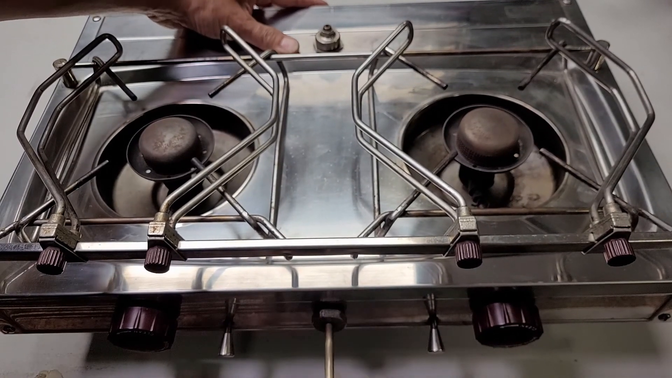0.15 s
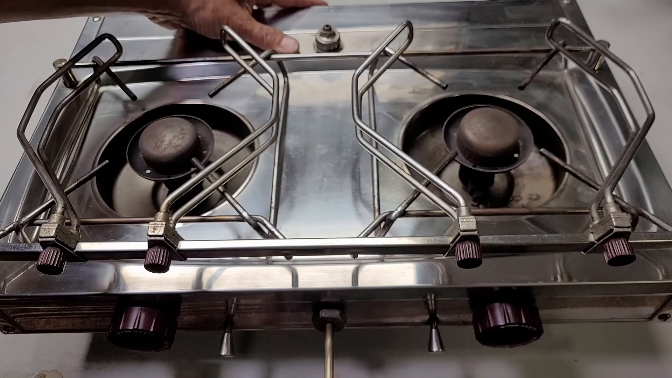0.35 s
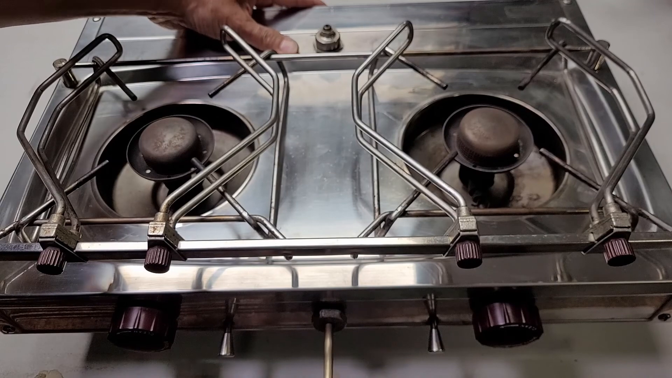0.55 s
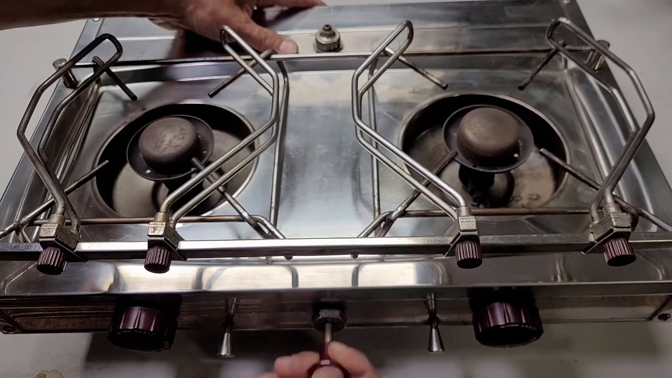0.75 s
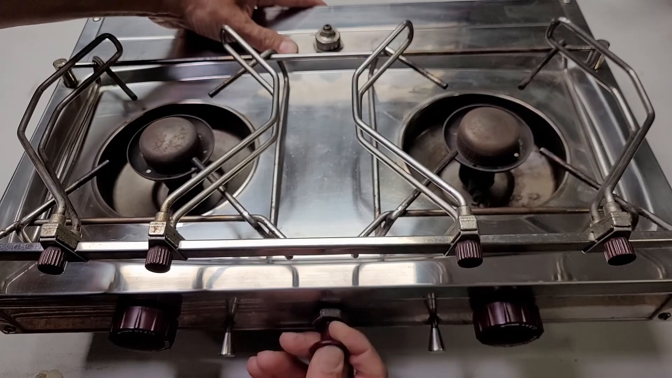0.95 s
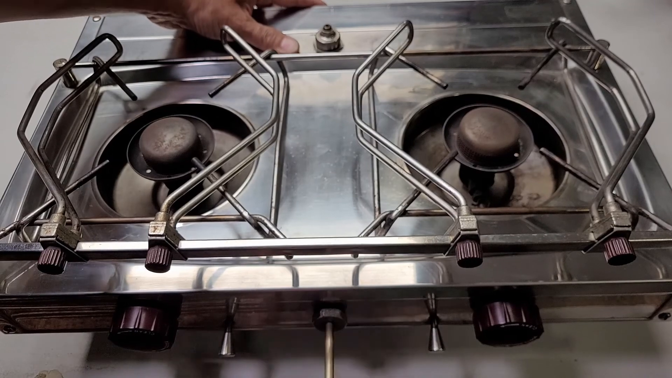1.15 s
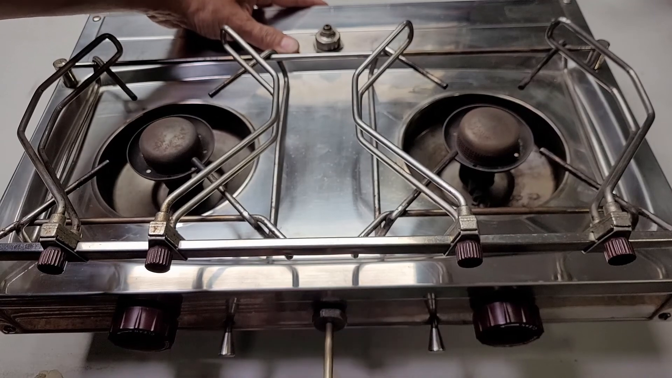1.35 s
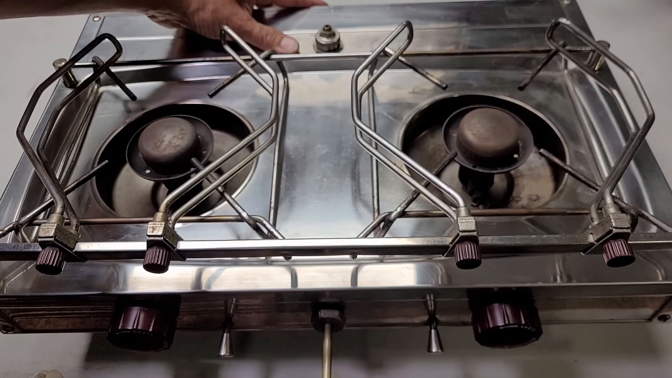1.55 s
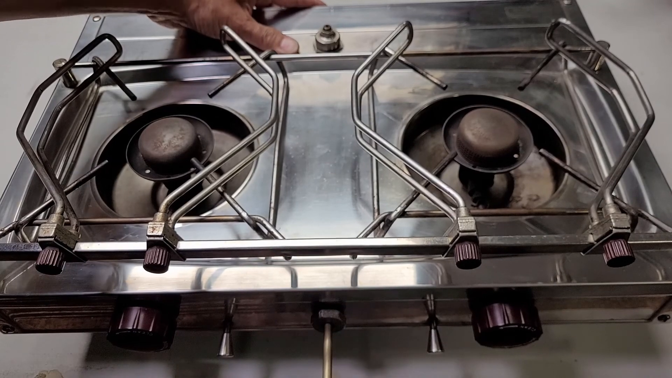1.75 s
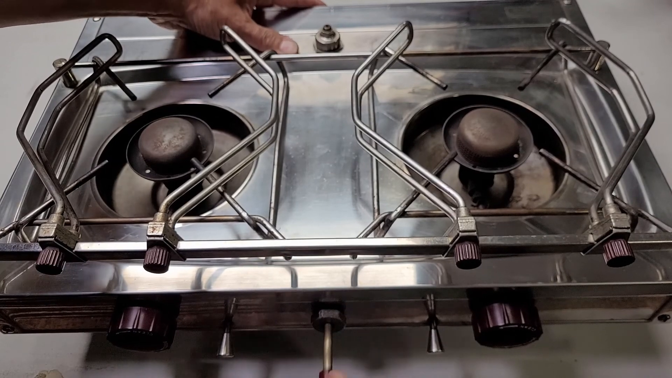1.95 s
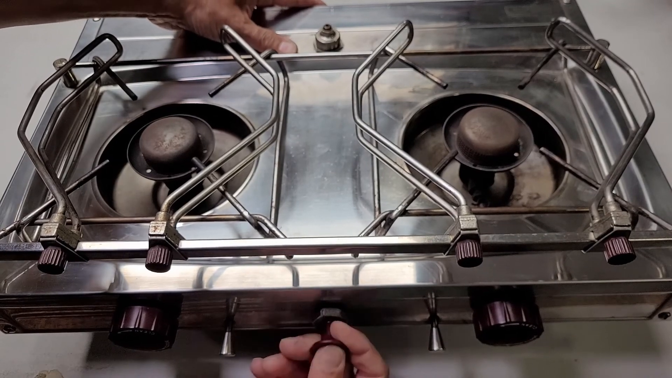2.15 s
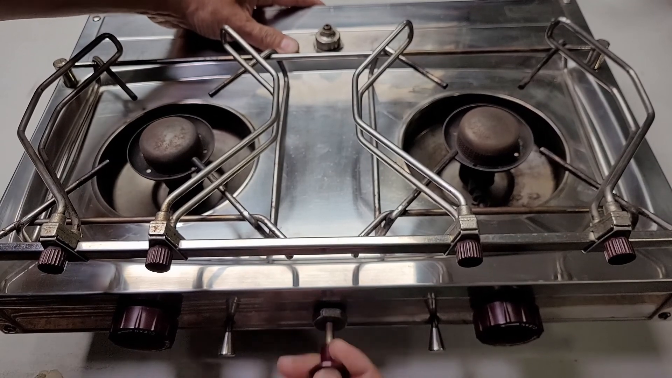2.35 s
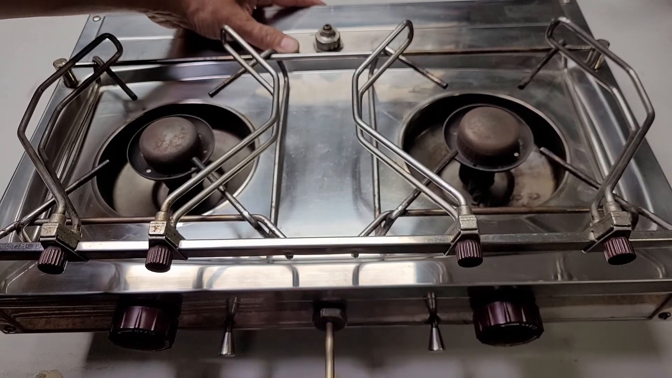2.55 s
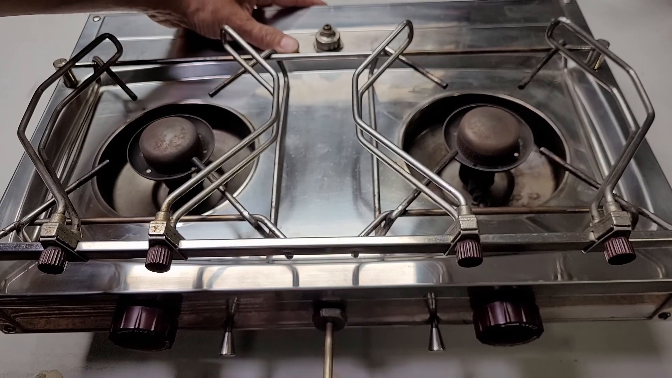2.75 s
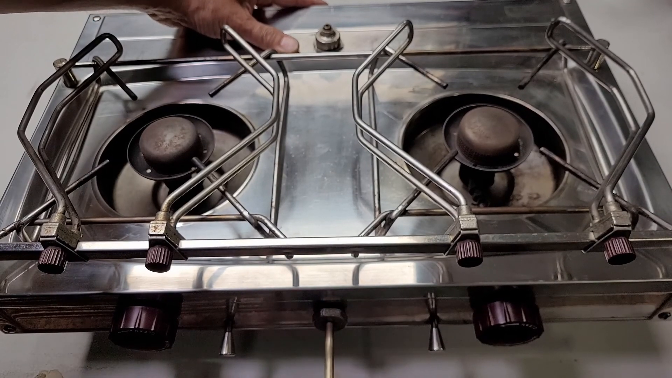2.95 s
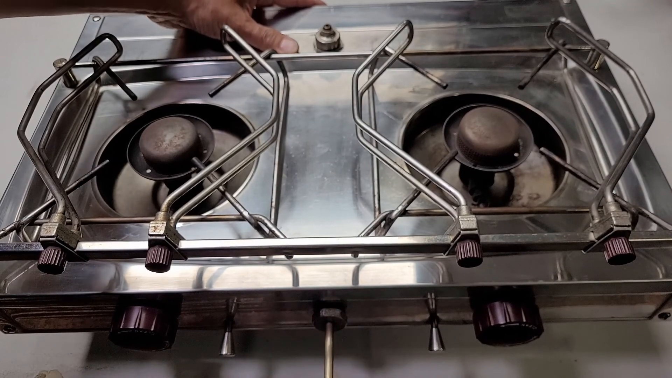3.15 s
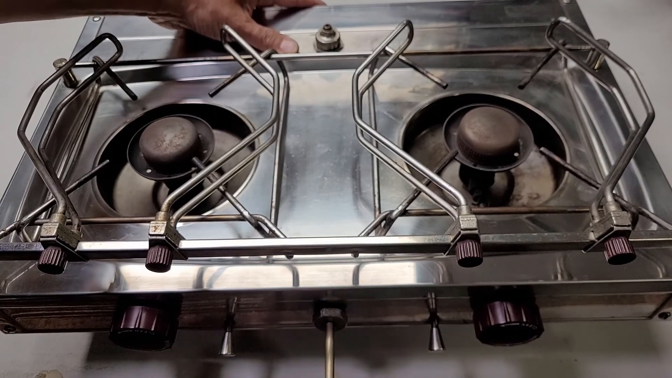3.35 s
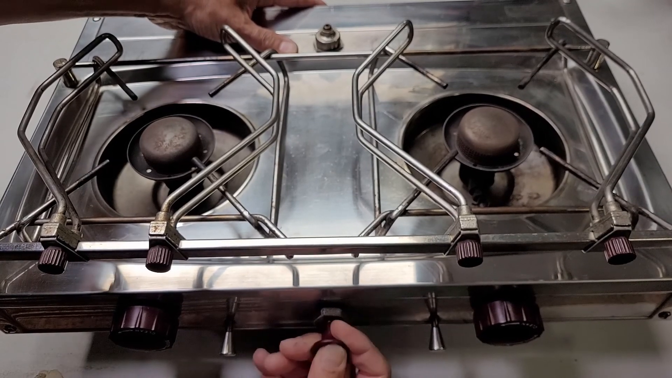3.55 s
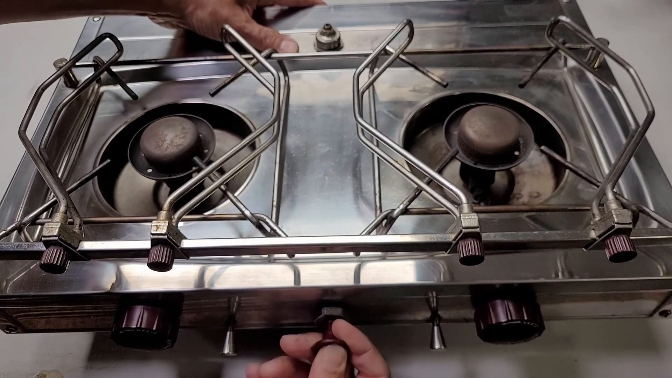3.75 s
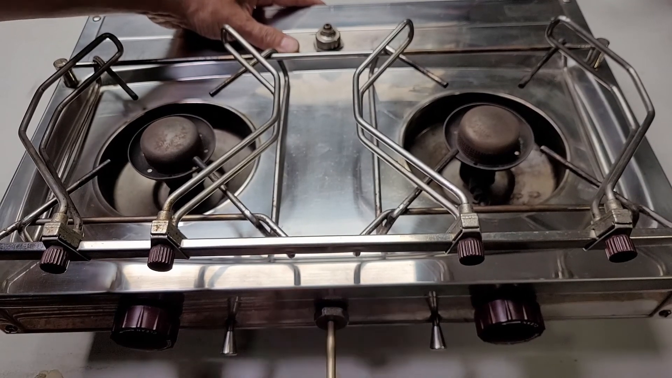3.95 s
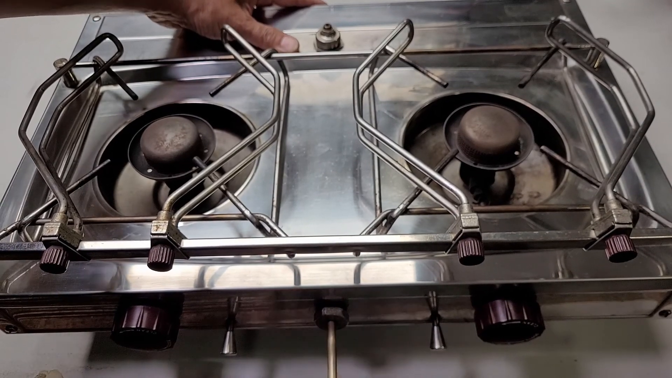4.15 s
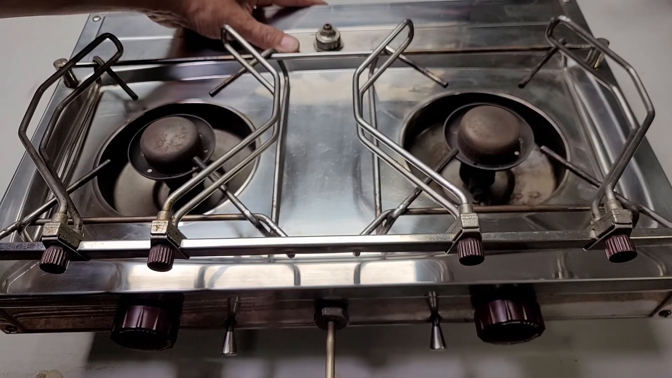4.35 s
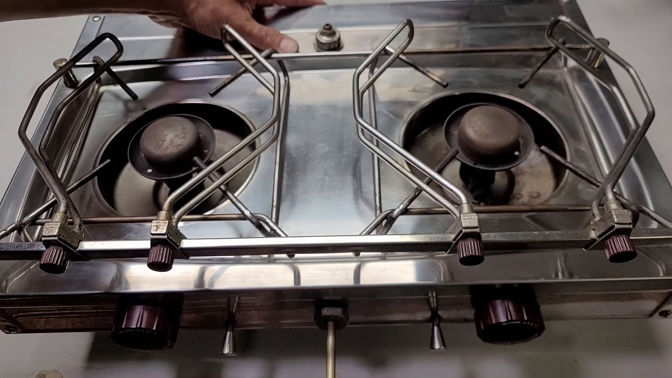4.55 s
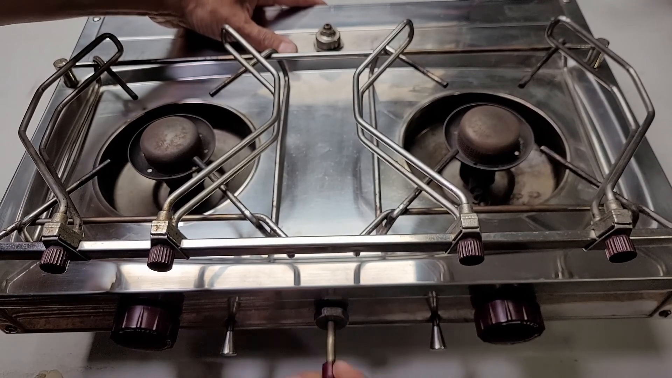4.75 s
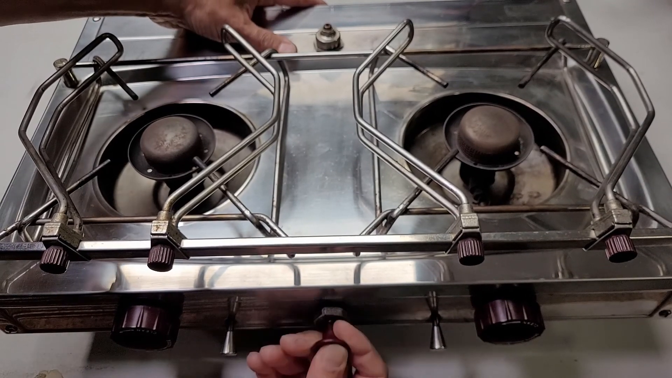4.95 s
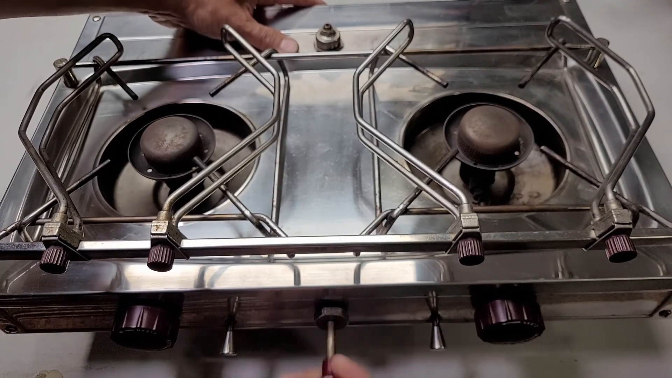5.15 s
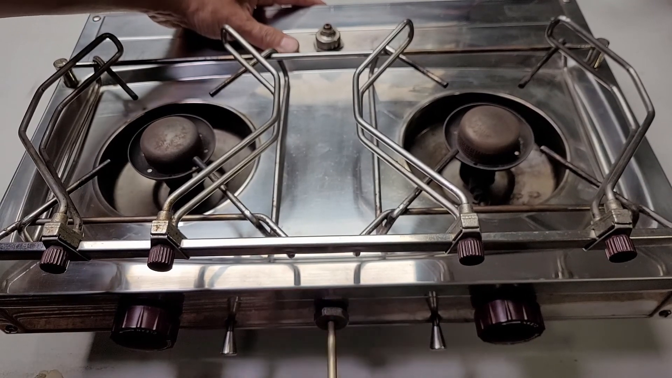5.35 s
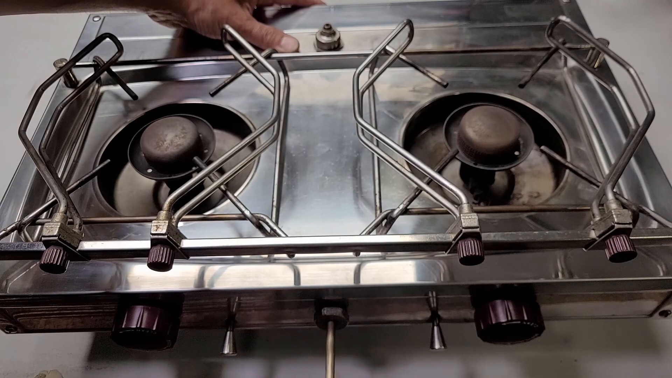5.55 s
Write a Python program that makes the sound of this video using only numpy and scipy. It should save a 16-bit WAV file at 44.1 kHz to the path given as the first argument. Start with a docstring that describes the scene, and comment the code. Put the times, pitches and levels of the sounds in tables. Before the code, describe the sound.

Four close pump strokes on a steel kerosene stove hiss and clank, with faint rubbing as the rod is drawn back.

```python
"""The hand pump of a steel kerosene stove is worked in four short strokes, close by in a small room.
Each push drives hissing air into the tank and ends with the plunger knocking the sheet-steel body.
As the rod is drawn back it rubs and catches, air slips past the cup washer (the pump's seal) with a
thin whistle, and the rod bumps its back stop. Between strokes the slack rod shifts and squeaks faintly."""
import sys
import numpy as np
from scipy import signal
from scipy.fft import rfft, irfft, next_fast_len
from scipy.io import wavfile

SR = 44100
rng = np.random.default_rng(int(sys.argv[2]) if len(sys.argv) > 2 else 0)


def int16_out(signal):
    """Quantize to a 16-bit WAV file."""
    q = np.round(np.clip(np.atleast_2d(signal).T, -1, 1) * 32767)
    wavfile.write(sys.argv[1], SR, q.astype(np.int16))


N = 247401
TIME = np.arange(N) / SR
AGE = TIME[:int(1.2 * SR)]  # seconds since one short sound began
ROOM_T60_S = .27  # a t60 is the time a sound takes to fade by 60 dB
RUB_ATTACK_S, RUB_RELEASE_T60_S = .074, .35

# air slipping past the washer at the end of a draw: t/s, length/s, puff/dB, whistle/dB
INTAKES = [(0, 0.0034, -34.5, -36), (1.363, 0.03, -42, -39), (2.689, .035, -41.5, -40),
           (4.174, 0.029, -40.5, -43.5)]
# spurts of air forced through the valve: t/s, length/s, hiss/dB, tank drone/dB, thud/dB
SPURTS = [(.742, 0.029, -33.5, -26.5, -26.5), (0.782, 0.041, -33.5, -27, -26.5),
          (0.82, .03, -33.5, -26.5, -19), (.861, 0.052, -30, -21, -15.5), (2.064, .049, -33, -21.5, -23.5),
          (2.086, .065, -30.5, -23, -17.5), (3.588, 0.035, -29, -15, -27),
          (3.597, 0.064, -28, -18.5, -37.5)]
# the rod being drawn back: t/s, length/s, rub/dB, hiss/dB, thud/dB
DRAWS = [(1.119, 0.22, -56.5, -63.5, -31), (2.404, 0.24, -60.5, -66.5, -37.5),
         (3.882, 0.322, -60, -67, -36.5), (5.21, 0.22, -59, -60, -27)]
# modes (natural ringing tones) of the steel body: f/Hz, level/dB, t60/s
BODY_MODES = [(269, -9, .5), (329, 2, .38), (488, -17, .25), (626, -5.5, .25), (721, -5, .25),
              (758, -3, .3), (821, -9, .25), (918, -3, .26), (996, -12, .35), (1077, -9.5, .26),
              (1210, -6, .25), (1245, -10, .25), (1405, -10, .33), (1491, -2, .24), (1588, -8, .2),
              (1952, -10, .28), (2106, -11, .35), (2223, -5, .24), (2519, -15, .26), (2799, -17, .24),
              (2993, -15, .27), (3230, -12, .2), (3541, -9, .22), (3600, -10, .2), (3677, -11, .25),
              (4094, -13, .3), (4274, -16, .28), (4447, -10, .18)]
# modes of the wire pan supports: f/Hz, level/dB, t60/s
WIRE_MODES = [(4100, -4, .9), (4590, -3, 1.5), (4670, -1, 1.8), (4740, -4, 1.4), (7350, 3, .65),
              (7620, 4, .65)]
# stereo width, the side (opposite in the two ears) against the mid (same in both): f/Hz, level/dB
STEREO_WIDTH = [(30, -11.5), (120, -12.5), (280, -16), (550, -5), (1000, -3.5), (2000, 1.5), (5000, 0),
                (16000, 0)]


def amp(db):
    """Turn decibels into a gain."""
    return 10 ** (np.asarray(db) / 20)


def along(points, hz):
    """Read between (frequency, value) points on a log-frequency axis."""
    f, value = np.transpose(points)
    return np.interp(np.log(np.maximum(hz, 1)), np.log(f), value)


def fade(t, t60):
    """A gain that dies away, 60 dB down after t60 seconds."""
    return np.exp(-np.log(1000) * np.maximum(t, 0) / t60)


def add(out, s, sound):
    """Mix a sound in at s seconds."""
    i = max(int(s * SR), 0)
    out[:, i:i + sound.shape[1]] += sound[:, :N - i]


def noise(spectrum, size=len(AGE), ripple=None):
    """Stereo noise shaped by a spectrum: alike in both ears in the bass, spread wide in the treble."""
    n = next_fast_len(size)
    hz = np.arange(n // 2 + 1) * SR / n
    db = along(spectrum, hz) + (0 if ripple is None else along(ripple, hz))
    mid, side = rfft(rng.standard_normal((2, n))) * amp(db) * hz / (hz + 20)
    mid = irfft(mid, n)[:size]
    side = irfft(side * amp(along(STEREO_WIDTH, hz)), n)[:size]
    return np.array([mid + side, mid - side]) / mid.std()


def ring(modes, scatter_db, detune, stagger):
    """Struck metal rings as fading tones; stagger 0 starts them in step, 1 anywhere in their cycle."""
    out, power = 0, 0
    for (hz, db, t60), (strength, shift, lean) in zip(modes, rng.standard_normal((len(modes), 3))):
        phase = 2 * np.pi * (hz * (1 + detune * shift) * AGE + stagger * rng.random())
        mid = np.sin(phase)
        side = np.sign(lean) * amp(along(STEREO_WIDTH, hz)) * np.cos(phase)
        out = out + amp(db + scatter_db * strength) * fade(AGE, t60) * np.array([mid + side, mid - side])
        power += amp(db) ** 2 / 2
    return out / np.sqrt(power)


def burst(length, rise_s, room_db):
    """The loudness of a gust that opens, holds, shuts and lingers in the room."""
    after = AGE - length
    room = amp(room_db)
    return (1 - np.exp(-AGE / rise_s)) * ((1 - room) * fade(after, .049) + room * fade(after, ROOM_T60_S))


def flutter(per_s, depth_db, size=len(AGE)):
    """A gain that wanders at random, per_s times a second."""
    steps = np.arange(size) * per_s / SR
    return amp(depth_db * np.interp(steps, np.arange(4096), rng.standard_normal(4096)))


def slide(s, length, attack_s, release_t60, db_per_s=0):
    """The loudness of one move of the rod: it gets going, changes by db_per_s, then dies away."""
    age = TIME - s
    run = np.clip(age, 0, length)
    trend = amp(db_per_s * (run - length / 2))
    return np.minimum(run / attack_s, 1) * trend * fade(age - length, release_t60)


def steel_ripple(depth_db, peak_db, width_hz):
    """The steel body colours sounds with peaks at its modes and chance peaks higher up: f/Hz, level/dB."""
    hz = np.geomspace(200, 17000, 720)
    mode_hz = np.transpose(BODY_MODES)[0]
    gap_hz = np.abs(hz[:, None] - mode_hz).min(axis=1)
    peaks = peak_db * (1 / (1 + (gap_hz / width_hz) ** 2) - .3)
    chance = depth_db * rng.standard_normal(len(hz)) * np.minimum(hz / 3500, 1)
    return np.c_[hz, peaks + chance]


def air_puffs(ripple):
    """The washer lets go or leaks, and a puff of air slips into the barrel."""
    # small leaks past the washer: t/s, length/s, level/dB
    leaks = [(2.885, 0.0042, -60), (2.963, 0.012, -53), (4.337, 0.014, -61)]
    # tone colour of the slipping air: f/Hz, level/dB
    puff_spectrum = [(100, -28), (270, 24), (450, 6.5), (1000, 10.5), (1400, 0.5), (2200, -6.5),
                     (4500, -5.5), (6500, -2), (9000, -6.5), (11500, -5.5), (13200, 0), (16000, -8)]
    out = np.zeros((2, N))
    for s, length, db, *_ in INTAKES + leaks:
        puff = noise(puff_spectrum, ripple=ripple) * flutter(per_s=440, depth_db=1)
        add(out, s, amp(db) * puff * burst(length, rise_s=.0011, room_db=-2))
    return out


def whistles_and_squeaks():
    """Incoming air whistles and the washer and rod squeak: gliding tones, rougher the higher they are."""
    # squeaks of washer and rod: t/s, length/s, start f/Hz, end f/Hz, level/dB
    squeaks = [(.424, 0.015, 9850, 9630, -36), (1.586, 0.043, 1583, 1475, -59),
               (2.928, 0.028, 11580, 13050, -54.5), (2.935, 0.031, 1450, 1477, -60.5),
               (4.443, .051, 1423, 1490, -61.5), (5.38, .025, 14400, 15600, -56),
               (5.425, .0089, 14950, 15700, -45), (5.449, 0.046, 1470, 1544, -54)]
    whistle_s, from_hz, to_hz = .017, 13080, 12920
    whistles = [(s, whistle_s, from_hz, to_hz, db) for s, *_, db in INTAKES]
    out = np.zeros((2, N))
    for s, length, start_hz, end_hz, db in whistles + squeaks:
        phase = 2 * np.pi * np.cumsum(np.interp(AGE, [0, length], [start_hz, end_hz])) / SR
        smoothing = signal.butter(2, 85 + .011 * start_hz, fs=SR, output="sos")
        waver = signal.sosfilt(smoothing, rng.standard_normal((2, 2, len(AGE))))
        tone = (waver[0] * np.sin(phase) + waver[1] * np.cos(phase)) / waver.std()
        add(out, s, amp(db) * tone * burst(length, rise_s=.00071, room_db=-10.5))
    return out


def tank_thuds():
    """Soft shoves from the pump thump the tank and its housing, and faintly stir the wires."""
    # the rod bumping its back stop: t/s, level/dB
    bumps = [(.049, -25.5), (1.428, -27.5), (2.76, -29), (4.239, -26.5)]
    # the load on the tank shifting: t/s, level/dB
    load_shifts = [(.583, -39.5), (1.594, -48), (2.011, -50), (3.268, -50), (5.407, -34), (5.513, -30)]
    # modes of the fuel tank: f/Hz, level/dB, t60/s
    tank_modes = [(76, -22, .42), (235.6, -8.5, .26), (267.6, 2, .4), (285, 5, .11), (298, -8, .6),
                  (327.8, -4, .34), (635, -18, .35), (890, -19, .24)]
    # tone colour of the thumped housing: f/Hz, level/dB
    housing_spectrum = [(24, -65.5), (40, -27.5), (175, -13.5), (257, 0.5), (340, -20), (408, -18.5),
                        (490, -14), (677, -26.5), (898, -21.5), (1930, -41), (5000, -52), (6500, -85.5),
                        (11000, -120)]
    spurts = [(s + .003, db) for s, *_, db in SPURTS]
    draws = [(s, db) for s, *_, db in DRAWS]
    jolts = [(s, db - .5) for s, _, db, _ in INTAKES]  # the washer lets go
    rebounds = [(s + .029, db - 7.5) for s, db in bumps]
    soft_start = (1 - np.exp(-AGE / .0017)) ** 2
    out = np.zeros((2, N))
    for s, db in spurts + draws + jolts + bumps + rebounds + load_shifts:
        housing = amp(-6.5) * noise(housing_spectrum) * fade(AGE, .27)
        tank = amp(-1) * ring(tank_modes, scatter_db=.6, detune=.012, stagger=.27)
        wires = amp(-57) * ring(WIRE_MODES, scatter_db=2.5, detune=.0011, stagger=.96)
        add(out, s, amp(db) * (housing + tank + wires) * soft_start)
    return out


def rod_rubbing(ripple):
    """The rod rubs unevenly in its barrel: the tank rumbles, the guide scrapes, the washer hisses."""
    # the slack rod shifting between strokes: t/s, length/s, rumble/dB, scrape/dB, hiss/dB
    shifts = [(0.155, 0.087, -48, -76.5, -68.5), (0.364, 0.08, -52.5, -69.5, -56),
              (0.483, 0.24, -57, -70, -67.5), (1.51, 0.12, -47.5, -63.5, -88),
              (1.69, 0.16, -45.5, -58, -64), (1.853, 0.21, -53.5, -75.5, -70),
              (2.889, 0.085, -49, -62, -64.5), (2.988, 0.043, -49, -72, -89),
              (3.171, 0.18, -51.5, -67.5, -68.5), (3.417, 0.19, -54, -73, -65.5),
              (4.363, 0.12, -52, -63, -70), (4.484, 0.12, -47.5, -61.5, -62.5),
              (4.622, 0.14, -58.5, -73, -69), (4.819, 0.14, -51, -68, -62),
              (5.41, 0.057, -37, -52.5, -58.5)]
    # tone colours of the tank, the guide and the washer: f/Hz, level/dB
    rumble_spectrum = [(25, -48.5), (55, -51), (75, -5), (95, -17.5), (170, -9.5), (265, 8.5), (330, 5),
                       (410, -9), (620, -7), (1000, -61.5), (3000, -66.5)]
    scrape_spectrum = [(300, -4), (600, -1.5), (950, 2), (1500, -5.5), (2100, -13), (3000, -19.5),
                       (4300, -13), (5300, -19.5), (16000, -40)]
    hiss_spectrum = [(1000, -21.5), (2500, -12.5), (4500, -5), (5500, -0.5), (6800, 6), (8500, 0.5),
                     (9800, 7), (11500, 3.5), (13000, 7.5), (16000, -2)]
    rub_times, hiss_times = (RUB_ATTACK_S, RUB_RELEASE_T60_S), (.053, .28)
    lead_s = .05  # the washer hisses as it takes up the load, before the thud
    rumble_gain, scrape_gain, hiss_gain = np.zeros((3, N))
    for s, length, rub_db, hiss_db, _ in DRAWS:
        rumble_gain += amp(rub_db + 7) * slide(s, length, *rub_times, db_per_s=-46)
        scrape_gain += amp(rub_db) * slide(s, length, *rub_times, db_per_s=11)
        hiss_gain += amp(hiss_db) * slide(s - lead_s, length + lead_s, *hiss_times, db_per_s=11)
    for s, length, rumble_db, scrape_db, hiss_db in shifts:
        moving = slide(s, length, *rub_times)
        rumble_gain += amp(rumble_db) * moving
        scrape_gain += amp(scrape_db) * moving
        hiss_gain += amp(hiss_db) * slide(s, length, *hiss_times)
    sharp_ripple = steel_ripple(depth_db=5, peak_db=10.5, width_hz=4.6)
    rumble = amp(-3.5) * noise(rumble_spectrum, N) * flutter(per_s=25, depth_db=4.5, size=N)
    scrape = amp(-2) * noise(scrape_spectrum, N, sharp_ripple) * flutter(per_s=55, depth_db=4, size=N)
    hiss = amp(-3.06) * noise(hiss_spectrum, N, ripple) * flutter(per_s=160, depth_db=1.3, size=N)
    return rumble_gain * rumble + scrape_gain * scrape + hiss_gain * hiss


def panel_crash(ripple):
    """Struck steel panels have so many modes that they blur into noise; each band fades at its own pace."""
    # tone colour of the panels: f/Hz, level/dB
    panel_spectrum = [(40, -26), (150, -11), (300, -3.5), (450, -6.5), (560, -13), (660, -12.5), (950, -6),
                      (1300, -11.5), (1500, -6), (1800, -12), (3700, -13.5), (5100, -20), (7500, -20),
                      (16000, -29.5)]
    # how long the panels ring in the room: f/Hz, t60/s
    ring_times = [(60, .45), (250, .42), (600, .32), (1500, .33), (3500, .34), (7500, .33), (10000, .25),
                  (16000, .21)]
    wash = rfft(noise(panel_spectrum, ripple=ripple))
    hz = np.linspace(0, SR / 2, wash.shape[1])
    centres, t60s = np.transpose(ring_times)
    bands = [along(np.c_[centres, one_band], hz) for one_band in np.eye(len(centres))]
    return sum(irfft(wash * band, len(AGE)) * fade(AGE, t60) for band, t60 in zip(bands, t60s))


def plunger_knocks(ripple):
    """The plunger hits its stop: a crack, then body and wires ring; softer contact gives less treble."""
    # hits and rebounds of the plunger: t/s, level/dB, clang/dB, treble/dB, boom/dB
    knocks = [(.4245, -33, -3.5, 0, 0.5), (0.8844, -14, -3.5, -1, 1), (.897, -14.5, -2.5, -10, -12),
              (2.1185, -14, 0, -2, 6), (2.137, -16.5, -0.5, -1.5, -7), (2.404, -43.5, -8, -18, -10),
              (3.386, -53, -3.5, -4, 4.5), (3.621, -14, -0.5, -1, 3), (3.638, -15, -1, -7.5, -1),
              (4.9741, -18, -8, -8, 0.5), (5.204, -40.5, -13.5, -28, 1)]
    out = np.zeros((2, N))
    hz = np.linspace(0, SR / 2, len(AGE) // 2 + 1)
    # at the start the wires still sing from an earlier stroke
    add(out, 0, amp(-72.5) * ring(WIRE_MODES, scatter_db=7, detune=.001, stagger=.79))
    for s, db, clang_db, treble_db, boom_db in knocks:
        crack = amp(-4) * panel_crash(ripple) * (1 + amp(-1) * fade(AGE, .074))
        body = amp(-1) * ring(BODY_MODES, scatter_db=1.5, detune=.00091, stagger=.96)
        wires = amp(-42) * ring(WIRE_MODES, scatter_db=1.5, detune=.004, stagger=1)
        blow = (crack + body + wires) * (1 - np.exp(-AGE / .0011))
        colour = [(100, boom_db - .5), (330, boom_db), (600, 0), (950, 0),
                  (1700, clang_db), (8000, treble_db)]
        knock = irfft(rfft(blow) * amp(along(colour, hz)), len(AGE))
        add(out, s, amp(db) * knock[:, :SR])
    return out


def valve_spurts(ripple):
    """The valve snaps open, and air sputters through it and bubbles into the tank, which drones."""
    # tone colours of the hissing valve and the droning tank: f/Hz, level/dB
    valve_spectrum = [(450, -5.5), (950, 4), (1300, -2), (2500, -4.5), (5000, -1), (7000, 8.5),
                      (9000, -1.5), (11500, 3.5), (14000, 6), (16000, -7)]
    drone_spectrum = [(30, -34.5), (75, -18.5), (160, -14), (240, -10), (320, 11), (400, -8.5), (620, -9),
                      (1000, -30), (2000, -38.5), (6000, -67.5)]
    out = np.zeros((2, N))
    for s, length, hiss_db, drone_db, _ in SPURTS:
        air = amp(hiss_db) * noise(valve_spectrum, ripple=ripple) * flutter(per_s=120, depth_db=4)
        hiss = air * burst(length, rise_s=.0093, room_db=-10.5)
        click = amp(1.5) * air * fade(AGE, .017)
        tank = amp(drone_db - 5) * noise(drone_spectrum, ripple=ripple)
        drone = tank * burst(length, rise_s=.002, room_db=-9)
        add(out, s, hiss + click + drone)
    return out


def rod_catches(ripple):
    """During a draw the rod sticks and slips at random, and each catch makes it ring briefly."""
    # tone colour of the ringing rod: f/Hz, level/dB
    rod_spectrum = [(900, -30), (1350, -4), (1900, -14), (2450, -4), (3100, -3), (3900, -1), (4600, -4),
                    (5400, -14), (12000, -30)]
    catches_per_s = 140
    grip = sum(amp(rub_db) * slide(s, length, RUB_ATTACK_S, RUB_RELEASE_T60_S, db_per_s=35)
               for s, length, rub_db, *_ in DRAWS)
    catches = (rng.random(N) < catches_per_s / SR) * rng.exponential(size=N)
    tick = noise(rod_spectrum, ripple=ripple) * (fade(AGE, .012) + amp(-12) * fade(AGE, ROOM_T60_S))
    rattle = signal.fftconvolve(catches[None], tick, axes=1)[:, :N]
    return amp(-9) * grip * rattle / rattle.std()


def scene():
    """The stove stands slightly to the left in a quiet room."""
    # tone colour of the quiet room: f/Hz, level/dB
    room_spectrum = [(18, -54.5), (30, -22.5), (303, -12.5), (437, -12), (1460, -41), (3490, -47.5),
                     (4530, -29.5), (5310, -36), (16000, -38)]
    ripple = steel_ripple(depth_db=4, peak_db=2, width_hz=12)
    stove = plunger_knocks(ripple) + valve_spurts(ripple) + air_puffs(ripple) + whistles_and_squeaks()
    stove += tank_thuds() + rod_rubbing(ripple) + rod_catches(ripple)
    lean_left = amp([[.5], [-.5]])
    return stove * lean_left + amp(-76.5) * noise(room_spectrum, N)


def record(dry):
    """Thin the deep bass, round off the loudest peaks and cut the highest treble."""
    low_hz, top_hz = 48, 15900
    bass_cut = signal.butter(2, low_hz, "high", fs=SR, output="sos")
    treble_cut = signal.ellip(10, .2, 70, top_hz, fs=SR, output="sos")
    rounded = np.tanh(signal.sosfilt(bass_cut, dry))
    return signal.sosfilt(treble_cut, rounded)


dry = scene()
out = record(dry)
int16_out(out)
```